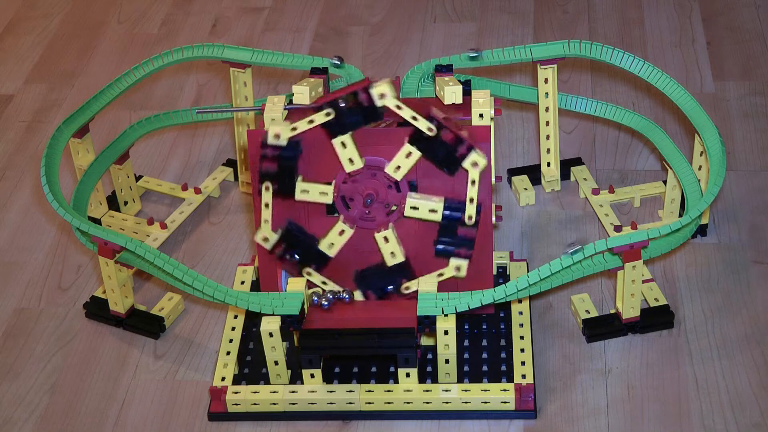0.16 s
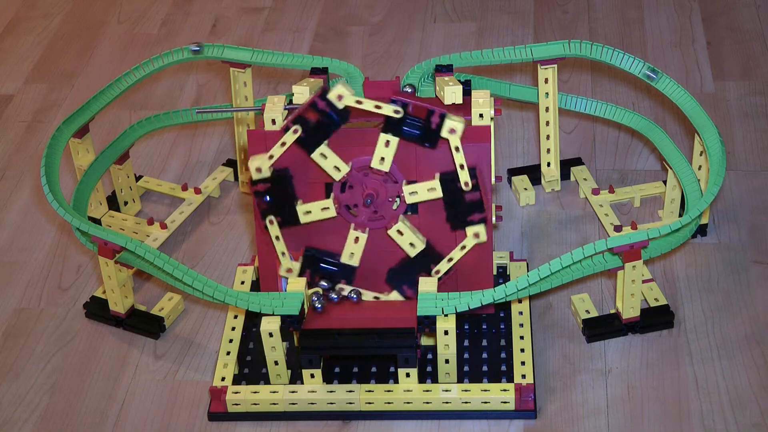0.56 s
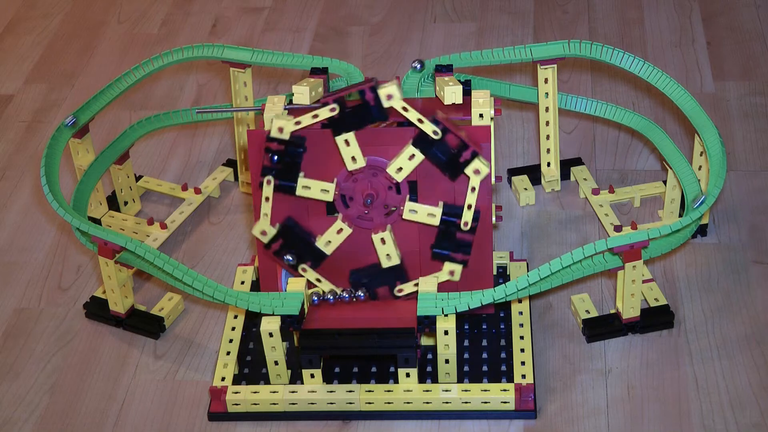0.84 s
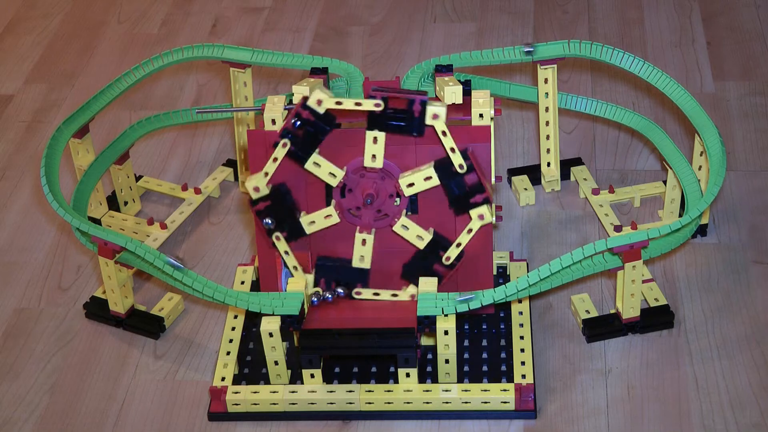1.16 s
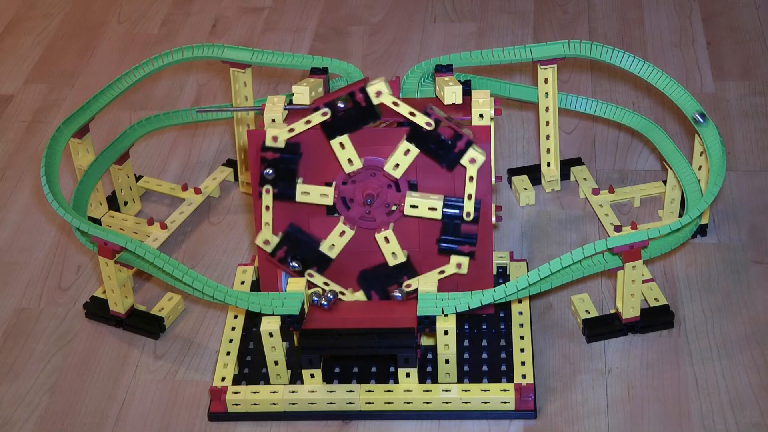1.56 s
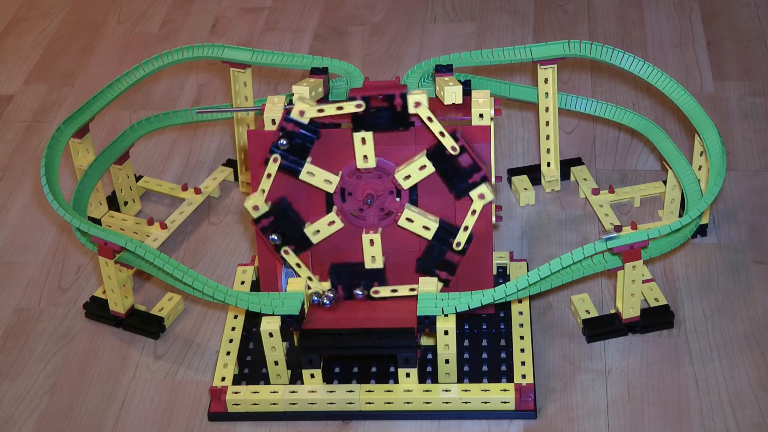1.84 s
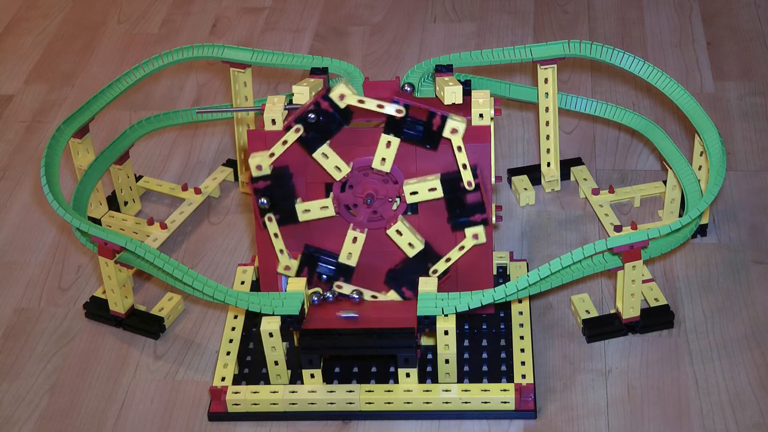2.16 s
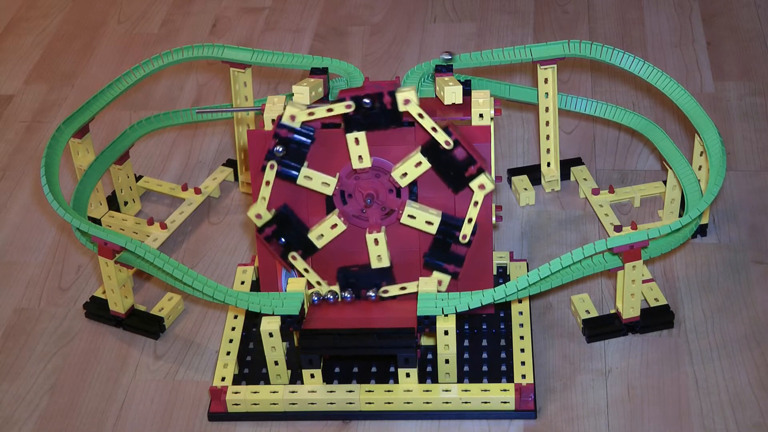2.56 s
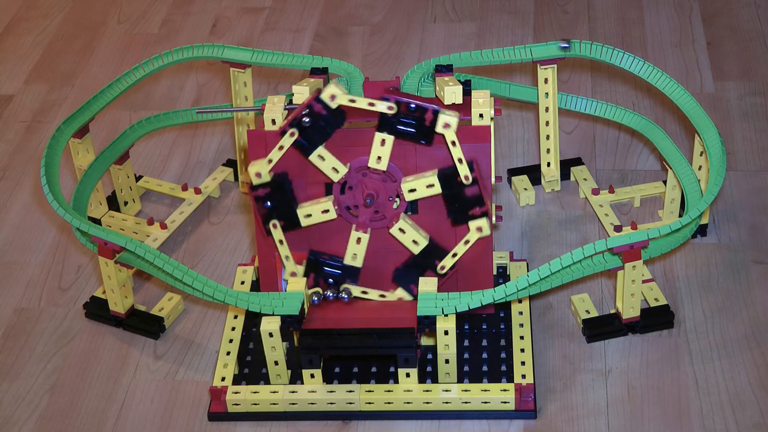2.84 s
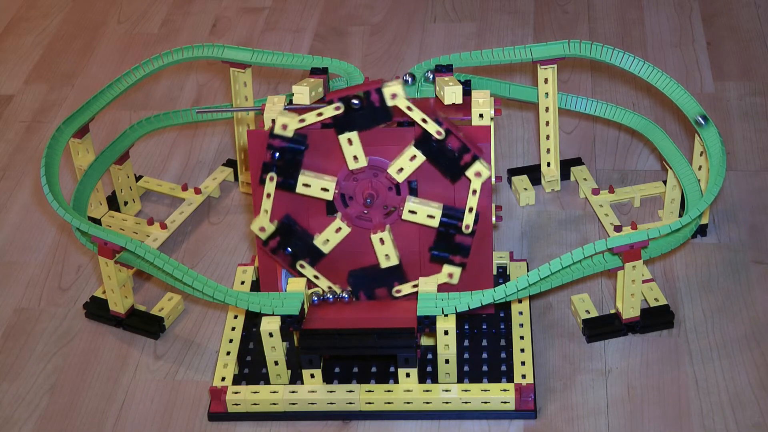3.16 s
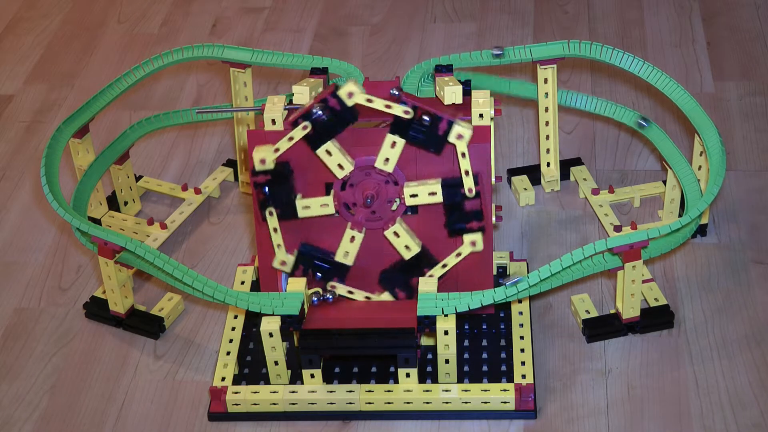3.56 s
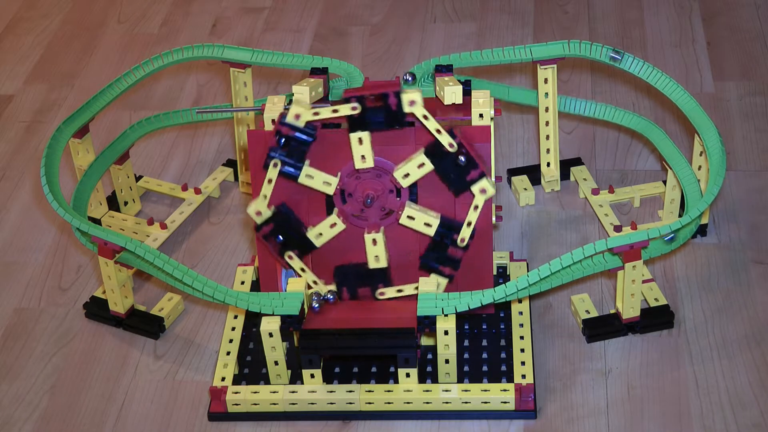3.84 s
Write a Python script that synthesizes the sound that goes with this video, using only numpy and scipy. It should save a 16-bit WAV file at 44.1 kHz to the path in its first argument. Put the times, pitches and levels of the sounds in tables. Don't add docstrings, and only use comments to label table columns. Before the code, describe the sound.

Steel balls roll along ribbed plastic tracks of a motorised marble machine, clacking and ticking constantly, with five harder crashes into waiting balls; faint gear rumble and thin metallic pings, close in a bare room.

```python
import sys
import numpy as np
from scipy import signal
from scipy.fft import rfft, irfft, next_fast_len
from scipy.io import wavfile
from scipy.ndimage import map_coordinates

SR = 44100
rng = np.random.default_rng(int(sys.argv[2]) if len(sys.argv) > 2 else 0)


def volts_from_decibels(level):
    exponent = np.asarray(level, float) / 20
    return 10 ** exponent


def unload_audio(sound):
    columns = np.transpose(np.atleast_2d(sound))
    steps = np.round(np.clip(columns, -1, 1) * 32767)
    wavfile.write(sys.argv[1], SR, steps.astype(np.int16))


N = 176400
LEAD = 60


def unit(x):
    return x / np.sqrt(np.mean(x ** 2) + 1e-20)


def along(points, hz):
    f, v = np.transpose(points)
    return np.interp(np.log(hz + 1), np.log(f + 1), v)


def wobble(rate_hz):
    knots = rng.standard_normal(int(N * rate_hz / SR) + 4)
    return map_coordinates(knots, [np.arange(N) * rate_hz / SR])


def filtered(x, response):
    m = next_fast_len(x.shape[-1] + 4096)
    spectrum = rfft(x, m) * response(np.fft.rfftfreq(m, 1 / SR))
    return irfft(spectrum, m)[..., :x.shape[-1]]


def colour(points):
    return lambda f: volts_from_decibels(along(points, f))


def peak(c_hz, w_hz):
    return lambda f: 1j * f * w_hz / (c_hz * c_hz - f * f + 1j * f * w_hz)


def add(out, x):
    out += x[..., :out.shape[-1]]


def burst(hold_s, fall_s):
    t = np.arange(1536) / SR - .001
    after = 0.26 * np.exp(-t / 0.015)
    shape = np.exp(-np.maximum(t - hold_s, 0) / fall_s) + after
    return (t > 0) * shape * rng.uniform(-1.17, 1, len(t))


def ring(modes, scatter_db, rise_s, blur_hz):
    t = np.arange(SR // 3) / SR
    steps = rng.standard_normal((len(modes), len(t)))
    drift = np.cumsum(steps, axis=1) * np.sqrt(2 * np.pi * blur_hz / SR)
    draw = rng.standard_normal((len(modes), 2))
    x = np.zeros(len(t))
    for (hz, db, t60_s), (level, phase), d in zip(modes, draw, drift):
        decay = volts_from_decibels(db + scatter_db * level - 60 * t / t60_s)
        x += decay * np.sin(2 * np.pi * hz * t + 2 * phase + d)
    x *= 1 - np.exp(-t / rise_s)
    return x / np.abs(x).max()


def strike(out, s, db, contact, body):
    direct = filtered(contact, body)
    clean = filtered(1. * (np.arange(len(contact)) == LEAD), body)
    send = clean * np.linalg.norm(direct) / np.linalg.norm(clean)
    gain = volts_from_decibels(db) / np.abs(direct).max()
    add(out[:, round(s * SR):][:, :len(direct)], gain * np.array([direct, send]))


def rattle(per_s, spread_db, hiss):
    levels = volts_from_decibels(spread_db * rng.standard_normal(N))
    hits = (rng.random(N) < per_s / SR) * levels * rng.choice([-1, 1], N)
    return unit(hits) + hiss * rng.standard_normal(N)


# t/s, level/dB [peak], floor thump level/dB
QUEUE_CRASHES = [
    (0.4827, -14.5, -55),
    (1.335, -12.5, -55),
    (1.4343, -14.5, -54.5),
    (2.206, -12.5, -48),
    (3.7911, -12, -39.5),
]
# f/Hz, level/dB
PLASTIC = [(180, -19), (300, -31), (1430, 0.5), (2740, -1.5), (4170, -0.5), (5460, 0.5), (11800, -5.5),
           (16800, -11.5)]
# f/Hz, width/Hz, level/dB
CRACK_PEAKS = [(1460, 600, -12), (2410, 500, 0), (3170, 700, -2), (4210, 500, -7), (5160, 550, 1),
               (5910, 650, -2), (9680, 900, -9)]
# f/Hz, level/dB
FRAME_MODES = [(2280, -16), (2430, -19), (3300, -20), (3720, -15), (4450, -20), (5150, -19), (5900, -22),
               (9800, -25)]


def crashes():
    out, thump = np.zeros((2, N)), np.zeros(N)
    t = np.arange(2048) / SR
    floor_echo_s, frame_t60_s = .00142, .14
    frame = [(hz, db, frame_t60_s) for hz, db in FRAME_MODES]

    def slam(f):
        peaks = sum((-1) ** k * volts_from_decibels(db) * peak(hz, w_hz)(f) for k, (hz, w_hz, db) in enumerate(CRACK_PEAKS))
        return 0.096 * volts_from_decibels(along(PLASTIC, f)) + 3 * peaks

    for s, db, thump_db in QUEUE_CRASHES:
        at, i = round(s * SR), np.arange(1536)
        hit = (i == LEAD) - .7 * (i == LEAD + round(floor_echo_s * SR))
        strike(out, s, db + 1.5, hit + .12 * burst(hold_s=.002, fall_s=.0006), slam)
        ringing = ring(frame, scatter_db=4, rise_s=0.00055, blur_hz=30.8)
        add(out[:, at:][:, :SR // 3], volts_from_decibels(db - 15) * ringing)
        push = t * np.exp(-t / 0.0024) * np.cos(2 * np.pi * 45 * t)
        add(thump[at:][:2048], volts_from_decibels(thump_db + 70) * push)
    return out, thump


# t/s, level/dB [peak], f/Hz
CLACKS = [(0.3137, -27.5, 4270), (0.3624, -30, 5400), (0.3708, -17, 5160), (0.4218, -40, 4470),
          (0.4632, -23, 3730), (0.475, -19.5, 6560), (0.5197, -22.5, 2440), (0.55, -20.5, 5240),
          (0.851, -30, 4300), (1.0269, -27, 2800), (1.084, -25, 3600), (1.114, -21.5, 4970),
          (1.1376, -25, 4600), (1.197, -22.5, 4150), (1.2397, -22, 4300), (1.4123, -22, 2570),
          (1.4884, -24, 5870), (1.5026, -22, 3800), (1.7833, -20.5, 4730), (1.8974, -31, 2240),
          (1.9102, -31, 4700), (1.9482, -24, 4540), (2.0154, -24, 3220), (2.0742, -29.5, 4400),
          (2.2808, -20.5, 2840), (2.5455, -33, 2230), (2.5858, -30.5, 4370), (2.5983, -27.5, 4450),
        (2.609, -22.5, 4070), (2.7284, -27.5, 4700), (2.844, -33, 5260), (2.884, -28, 5170),
        (2.908, -20.5, 3650), (2.95, -32, 1900), (3.146, -28.5, 4570), (3.184, -31, 4770),
        (3.2482, -33.5, 2260), (3.2767, -26, 4060), (3.31, -22, 5700), (3.3903, -31.5, 4810),
        (3.443, -21, 3330), (3.5279, -22, 3680), (3.8277, -23.5, 3680), (3.8636, -18.5, 4540),
          (0.0833, -36, 4900), (0.1311, -38, 3170), (0.168, -30.5, 2670), (0.7277, -54, 5400),
         (0.9313, -31.5, 1950), (1.0397, -26.5, 3720), (1.05, -34, 3300), (1.1512, -26.5, 4450),
         (1.1924, -24.5, 4130), (1.2194, -27, 4700), (1.6801, -30.5, 2910), (1.796, -29, 4600),
         (1.9707, -24, 4550), (2.2425, -24, 3800), (2.394, -31.5, 4630), (2.482, -35, 3200),
         (2.824, -44, 4730), (3.3313, -25.5, 4460), (3.4044, -32, 4730), (3.5145, -24.5, 5730),
         (3.6666, -36.5, 2980), (3.6928, -43, 3380), (3.7074, -34, 2960), (3.7216, -31, 2830)]
# t/s, level/dB [peak], f/Hz
TRAY_BLOWS = [
    (.851, -32.5, 1260),
    (1.437, -19.5, 1450),
    (1.448, -26, 1706),
    (1.466, -35, 1660),
    (1.49, -30.5, 1750),
    (2.952, -25.5, 970),
]


def clacks():
    out = np.zeros((2, N))
    for s, db, hz in CLACKS + TRAY_BLOWS:
        body = lambda f: volts_from_decibels(along(PLASTIC, f)) * (.14 + peak(hz, .2 * hz)(f))
        strike(out, s, db + .1, burst(hold_s=.0004, fall_s=.0009), body)
    return out


# t/s, level/dB [peak]
STEEL_TICKS = [(0.1224, -38.5), (0.1817, -29), (0.231, -34), (0.3372, -30.5), (0.5753, -22),
               (0.6424, -31.5), (0.668, -32), (0.7279, -31.5), (1.174, -34), (1.2303, -25), (1.4624, -26),
               (1.4708, -28), (1.6052, -28.5), (1.6293, -32), (2.3272, -26.5), (2.4488, -35), (2.697, -34),
               (2.7374, -34), (3.9148, -24.5),
               (0.9822, -41.5), (1.026, -43), (1.085, -35), (1.1007, -29), (1.1985, -28), (1.7195, -48),
               (1.7587, -38), (1.854, -40), (1.911, -40), (1.9275, -33), (2.0152, -33), (2.0732, -35.5),
               (2.0981, -37), (2.413, -39), (2.4824, -41), (2.7147, -46), (2.7258, -30.5), (3.1692, -53),
               (3.2171, -56), (3.3814, -40), (3.388, -39), (3.464, -49), (3.474, -43), (3.485, -45),
               (3.5937, -35)]
# f/Hz, level/dB
TICK_COLOUR = [(2000, -17), (5000, 3), (8000, 1.5), (12000, -5.5), (16800, -5.5)]


def ticks():
    out = np.zeros((2, N))
    for s, db in STEEL_TICKS:
        strike(out, s, db + 1.5, burst(hold_s=.0003, fall_s=.0007), colour(TICK_COLOUR))
    return out


# t/s, level/dB [peak]
PLATE_KNOCKS = [(0.406, -35.5), (0.476, -30.5), (0.51, -30.5), (1.118, -35), (1.175, -28.5), (1.208, -35),
                (1.235, -32), (1.898, -40), (2.015, -30), (2.076, -34.5), (2.71, -41.5), (2.911, -30),
                (3.528, -27), (3.951, -43)]
# t/s, level/dB [peak]
ARM_KNOCKS = [
    (0.169, -38.5),
    (0.72, -33.5),
    (1.084, -41),
    (1.592, -32),
    (1.631, -31.5),
    (2.952, -31),
    (3.184, -33.5),
    (3.687, -40),
    (3.707, -42),
]


def knocks():
    out = np.zeros((2, N))
    plate_hz, arms_hz = 331, 620
    push = np.pad(np.hanning(24), (44, 3000))
    for hz, rows in ((plate_hz, PLATE_KNOCKS), (arms_hz, ARM_KNOCKS)):
        def hollow(f):
            modes = peak(hz, .35 * hz)(f) + 0.23 * peak(900, 900)(f)
            return modes * (1j * f / (1j * f + 210)) ** 4 / (1 + 1j * f / 1500) ** 2

        for s, db in rows:
            strike(out, s, db - 1, push, hollow)
    return out


# t/s, level/dB [peak]
PIN_PINGS = [
    (0.1561, -33.5),
    (1.5257, -37.5),
    (2.3352, -37.5),
    (3.0352, -36),
    (3.712, -36),
]
# f/Hz, level/dB, t60/s
PIN_MODES = [
    (7700, -3, .4),
    (7640, -14, .2),
    (12440, 0, .26),
    (12580, -7, .16),
    (12270, -10, .16),
]


def pings():
    out, t = np.zeros(N), np.arange(SR // 3) / SR
    held_s, damped_t60_s = 0.088, .06
    damped = volts_from_decibels(-60 * np.maximum(t - held_s, 0) / damped_t60_s)
    for s, db in PIN_PINGS:
        ringing = ring(PIN_MODES, scatter_db=2.5, rise_s=0.00032, blur_hz=21.6)
        add(out[round(s * SR):][:SR // 3], volts_from_decibels(db + 2.5) * damped * ringing)
    return out


# t/s [start], level/dB
QUEUE_SHUFFLES = [
    (0.18, -58),
    (.49, -35),
    (1.09, -45),
    (1.232, -33),
    (1.346, -38),
    (1.445, -38),
    (1.919, -37),
    (2.715, -38.5),
    (3.385, -43),
    (3.869, -33.5),
]


def shuffles():
    t, swell = np.arange(N) / SR, np.zeros(N)
    rise_s, t60_s = 0.0027, 0.067
    for s, db in QUEUE_SHUFFLES:
        swell += volts_from_decibels(db - 60 * np.abs(t - s) / t60_s) * np.clip((t - s) / rise_s, 0, 1)
    bright = colour([(1500, -12), (4500, -6), (9000, -12), (16800, -17)])
    return swell * unit(filtered(rattle(per_s=750, spread_db=4.5, hiss=0.85), bright))


# t/s, rolling level/dB, gear level/dB
MACHINE_LEVELS = [(.1, -50.5, -55.5), (.28, -52, -59), (.45, -40.5, -49), (.65, -46.5, -55),
                  (.82, -52, -57.5), (0.999, -48, -54.5), (1.25, -46, -56.5), (1.5, -46.5, -56.5),
                  (1.9, -49.5, -58.5), (2.15, -51.5, -58), (2.5, -53, -67), (2.75, -48, -56),
                  (3.101, -51, -59), (3.4, -43.5, -56.5), (3.65, -51, -57), (3.9, -45, -56.5)]
# f/Hz, level/dB
ROLL_COLOUR = [(530, -33), (900, -12), (1580, -3), (2210, -1), (4070, -2.5), (4650, -4), (5860, -12.5),
               (9000, -15), (16800, -23.5)]


def rolling():
    s, roll_db, _ = np.transpose(MACHINE_LEVELS)
    level_db = np.interp(np.arange(N) / SR, s, roll_db)
    ribs = lambda f: volts_from_decibels(along(ROLL_COLOUR, f)) * (f > 700)
    roll = unit(filtered(rattle(per_s=1000, spread_db=2.5, hiss=0.31), ribs))
    chatter = np.zeros(N)
    for hz, _ in FRAME_MODES[:-1]:
        contacts = rattle(per_s=90, spread_db=5, hiss=.3)
        chatter += volts_from_decibels(4 * wobble(15)) * filtered(contacts, peak(hz, .12 * hz))
    uneven = volts_from_decibels(2.5 * wobble(12) + 1.5 * wobble(40))
    return volts_from_decibels(level_db - 6) * (uneven * roll + .9 * unit(chatter))


# f/Hz, level/dB
GEAR_COLOUR = [(200, -8), (380, -5.5), (550, -2), (700, -2), (1500, -25)]


def gears():
    s, _, gear_db = np.transpose(MACHINE_LEVELS)
    level_db = np.interp(np.arange(N) / SR, s, gear_db)
    housing = lambda f: volts_from_decibels(along(GEAR_COLOUR, f)) / (1 + (f / 1500) ** 4) / (1 + (195 / (f + 1)) ** 8)
    rumble = unit(filtered(rattle(per_s=110, spread_db=4, hiss=0.52), housing))
    return volts_from_decibels(level_db - 1.5 + 2 * wobble(6.01) + 2.3 * wobble(18)) * rumble


EFFORTS = [.43, 1.05, 1.22, 1.75, 1.98, 2.1, 2.65, 2.9, 3.35, 3.55]


def motor():
    t = np.arange(N) / SR
    hum_hz, effort_s, effort_db = 93.7, 0.048, -69.5
    load = sum(volts_from_decibels(effort_db) * np.exp(-.5 * ((t - at) / effort_s) ** 2) for at in EFFORTS)
    hum = np.sin(2 * np.pi * np.cumsum(hum_hz * (1 + 0.043 * wobble(3.5))) / SR)
    return (load + volts_from_decibels(-84.5 + 2.5 * wobble(14))) * hum


# f/Hz, t60/s
ROOM_T60 = [(200, 0.38), (1500, 0.42), (5000, 0.39), (15000, 0.19)]
# delay/s, level/dB
ECHOES = [(0.0097, -9), (0.0117, -16.5), (.036, -16)]
# f/Hz, level/dB
ROOM_COLOUR = [(100, -13.5), (500, -4), (2000, -3.5), (6000, -5), (15000, -4.5)]


def room(near, send):
    out, step = np.zeros((2, N + SR)), SR // 10
    gap_s, lumps_db = .009, 2.4
    near, send = filtered(np.array([near, send]), colour(ROOM_COLOUR))
    for at in range(0, N, step):
        hz, t, z = signal.stft(rng.standard_normal((2, SR // 2)), SR, nperseg=128)
        decay = volts_from_decibels(-60 * t / along(ROOM_T60, hz)[:, None])
        lumps = volts_from_decibels(lumps_db * rng.standard_normal(len(t)))
        tail = signal.istft(z * decay * lumps, SR, nperseg=128)[1]
        tail = np.pad(tail / np.linalg.norm(tail[0]), ((0, 0), (round(gap_s * SR), 0)))
        wet = signal.fftconvolve(send[None, at:at + step], tail, axes=1)
        out[:, at:at + wet.shape[1]] += wet
    walls = sum(volts_from_decibels(db) * np.pad(near, (round(s * SR), 0))[:N] for s, db in ECHOES)
    return out[0, :N] + walls, out[1, :N]


# f/Hz, level/dB
AIR_COLOUR = [(25, -32), (90, 6), (157, -12), (250, -3)]


def air():
    low = lambda f: volts_from_decibels(along(AIR_COLOUR, f)) * (f < 300)
    return volts_from_decibels(-75.5) * unit(filtered(rng.standard_normal((2, N)), low))


# f/Hz, side over mid
SIDE_GAIN = [(100, 0.99), (500, 0.43), (2000, 0.44), (5000, 0.23), (8000, 0.24), (14000, 0.1)]


def scene():
    crash, thump = crashes()
    near, send = crash + clacks() + ticks() + knocks() + pings() + shuffles() + rolling() + gears()
    floor = thump + motor()
    room_mid, room_side = room(near, send)
    air_mid, air_side = air()
    mid = near + room_mid + floor + air_mid
    low = np.roll(floor, 150) + air_side
    wide = filtered(1.09 * room_side + 0.43 * low, lambda f: along(SIDE_GAIN, f))
    off_centre = filtered(near, lambda f: 0.047 + 0.1 / (1 + (f / 1500) ** 4))
    side = wide + off_centre
    return np.array([mid + side, mid - side])


def roll_off(x):
    return signal.sosfilt(signal.butter(12, 16820, fs=SR, output="sos"), x)


def record(dry):
    start_s, open_s, top_hz, above_db = 0.0781, 0.0031, 15850, -38
    opened = dry * np.clip((np.arange(N) / SR - start_s) / open_s, 0, 1)
    top = lambda f: volts_from_decibels(above_db * np.clip((f - top_hz) / 150, 0, 1))
    mix = filtered(opened, top) * (opened != 0)
    return roll_off(mix)


dry = scene()
out = record(dry)
unload_audio(out)
```